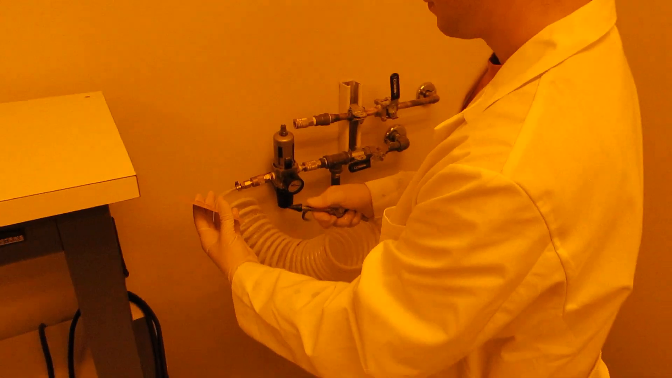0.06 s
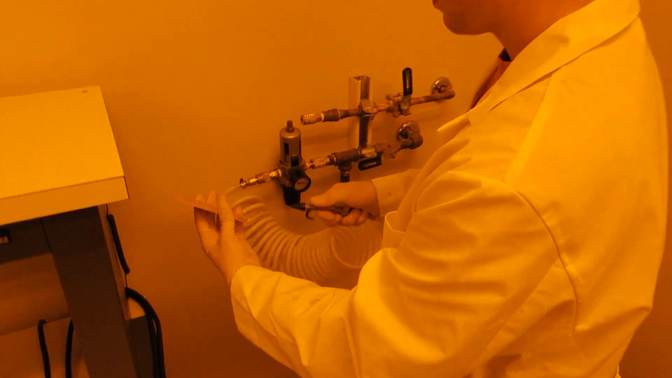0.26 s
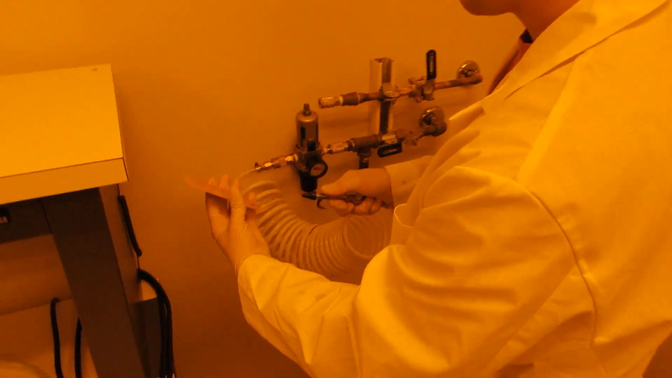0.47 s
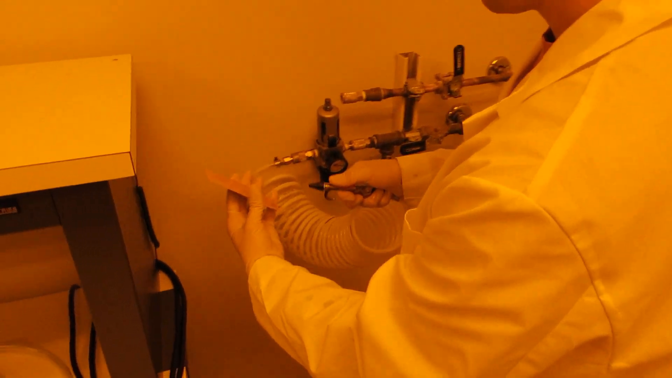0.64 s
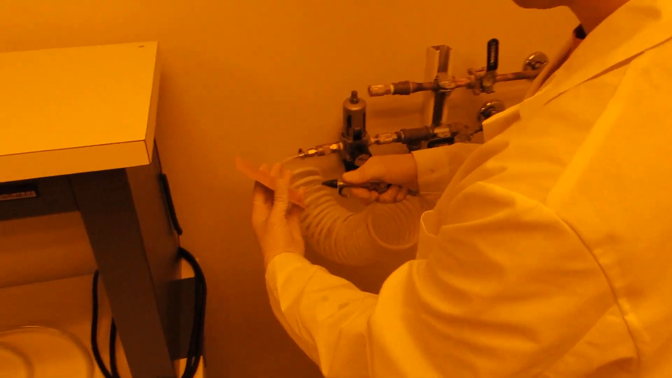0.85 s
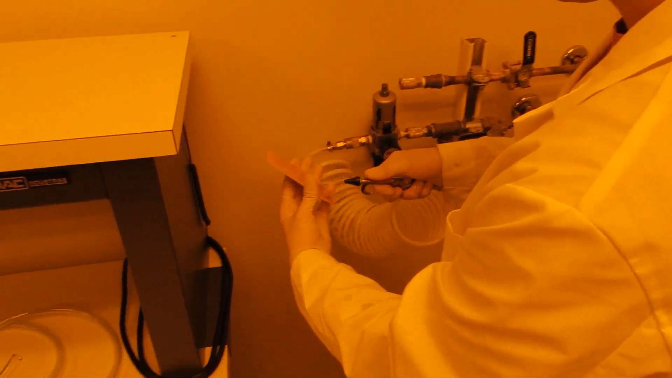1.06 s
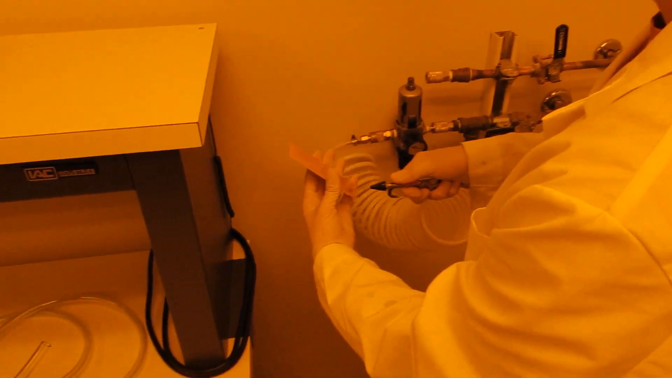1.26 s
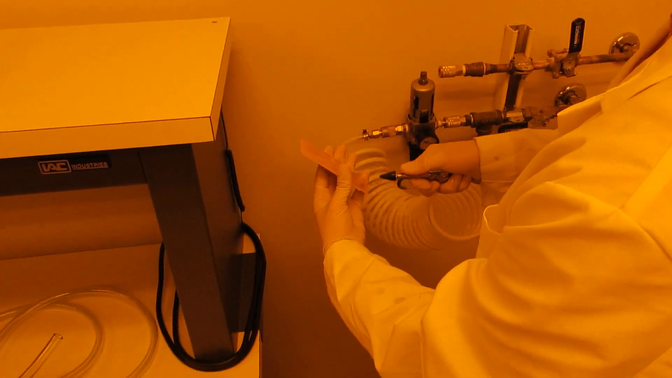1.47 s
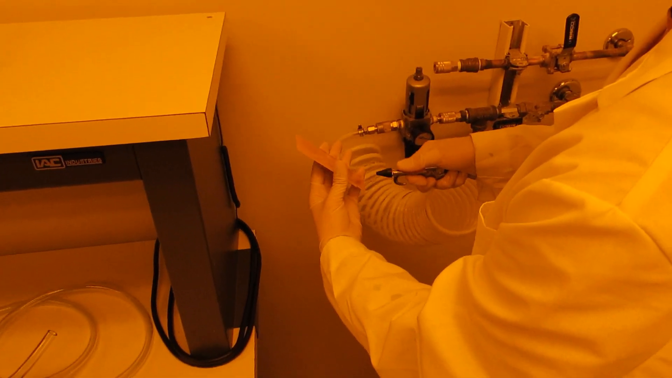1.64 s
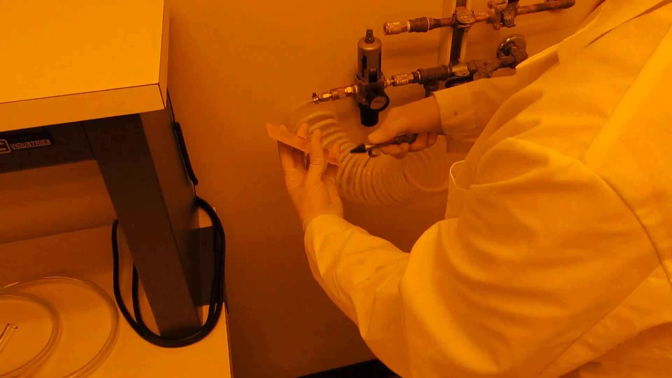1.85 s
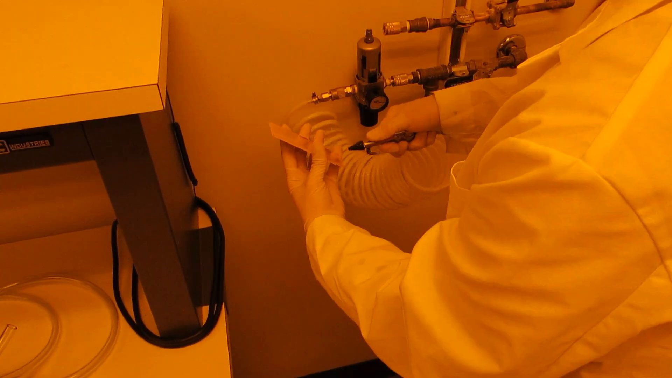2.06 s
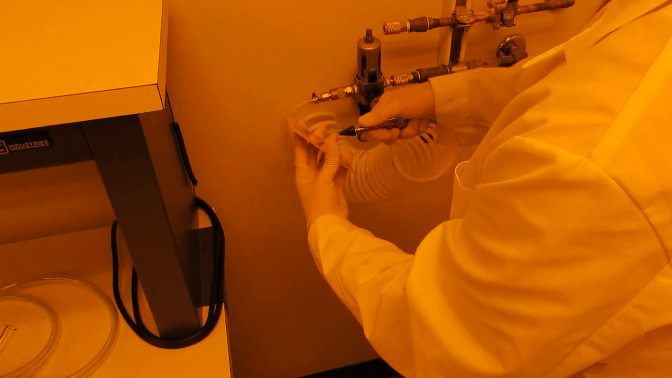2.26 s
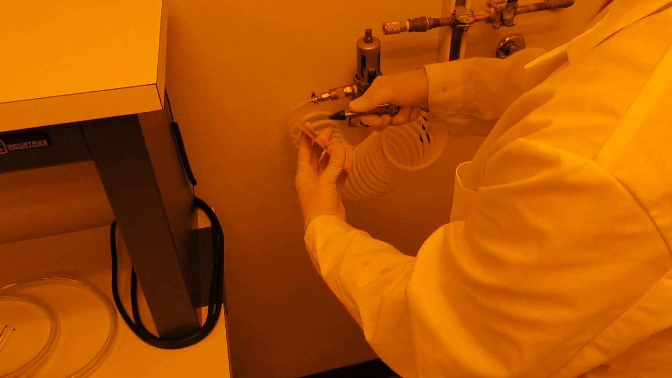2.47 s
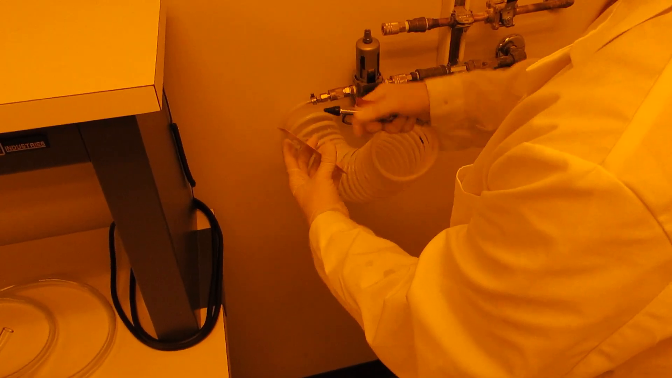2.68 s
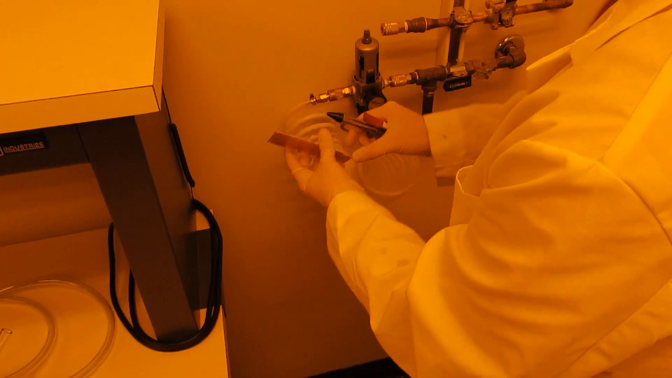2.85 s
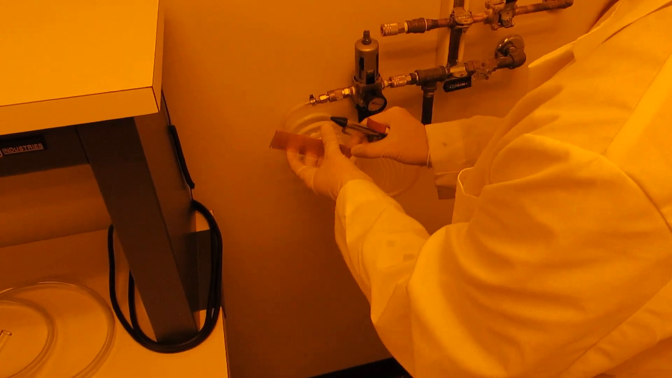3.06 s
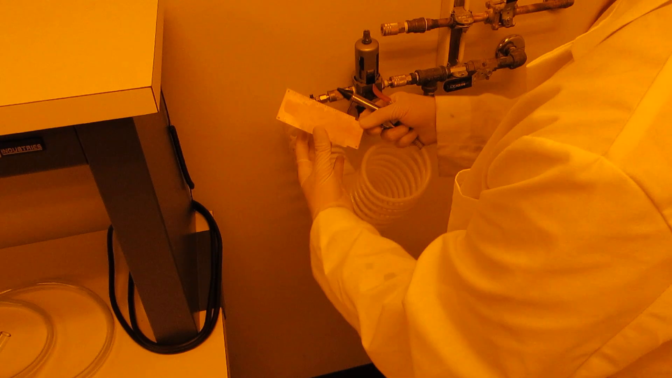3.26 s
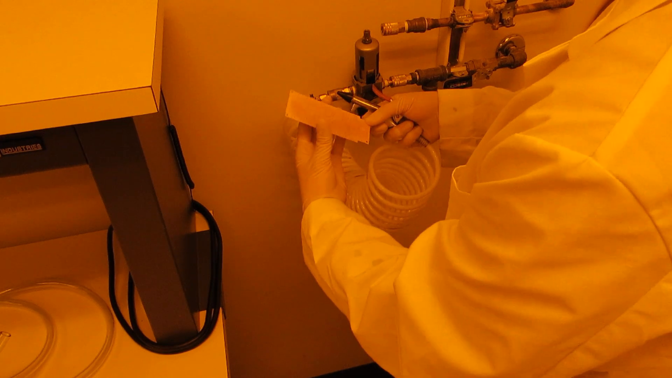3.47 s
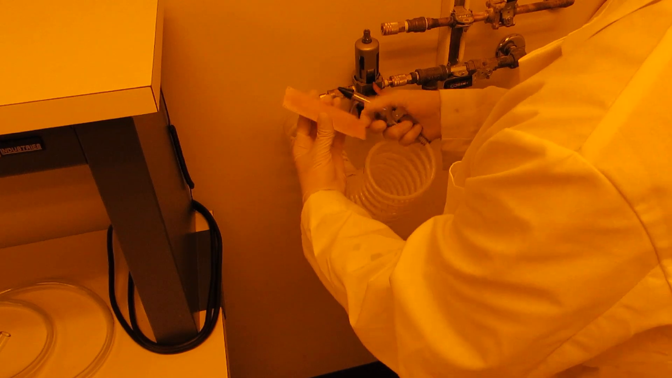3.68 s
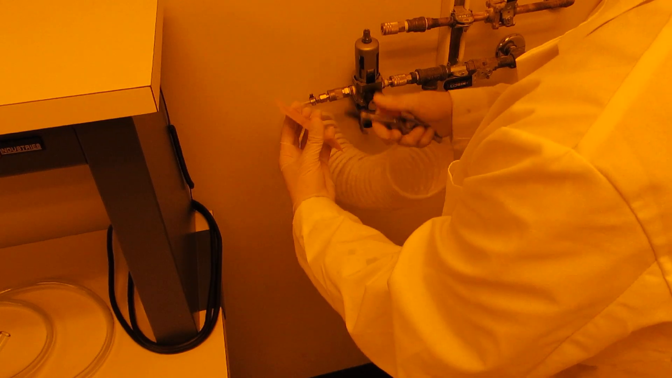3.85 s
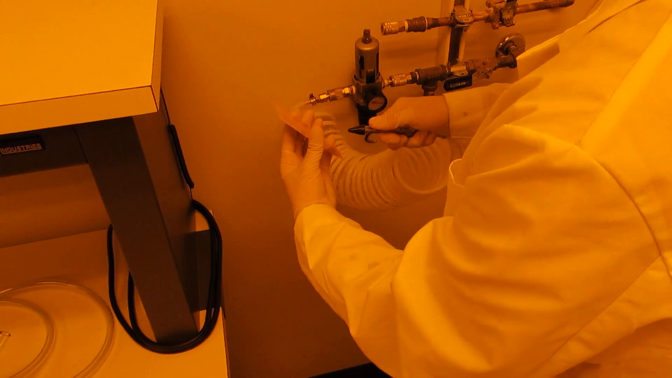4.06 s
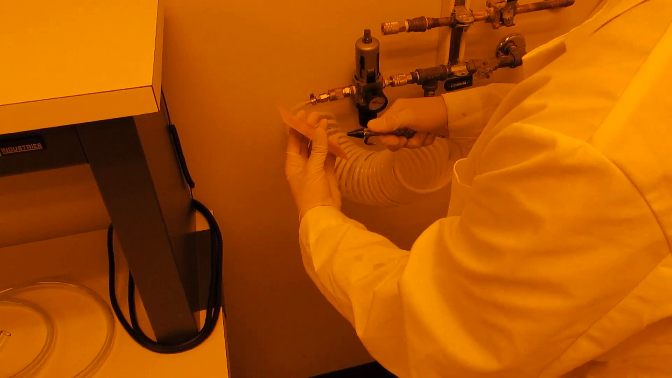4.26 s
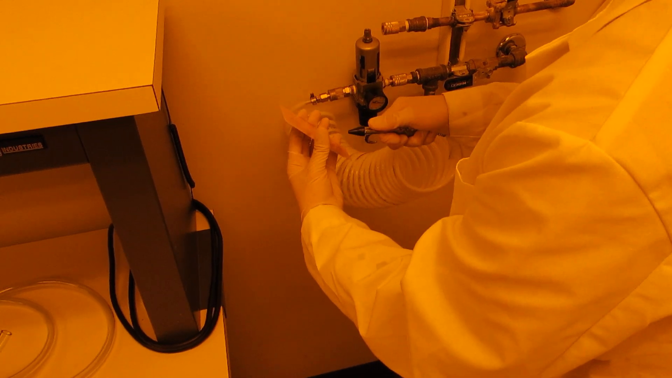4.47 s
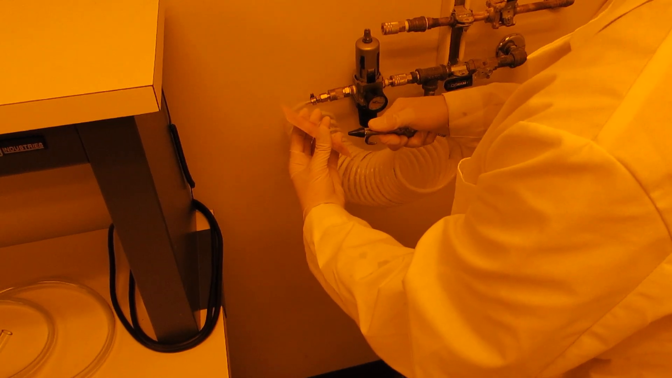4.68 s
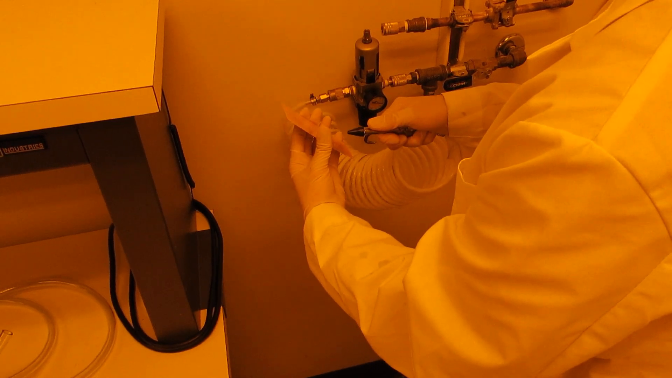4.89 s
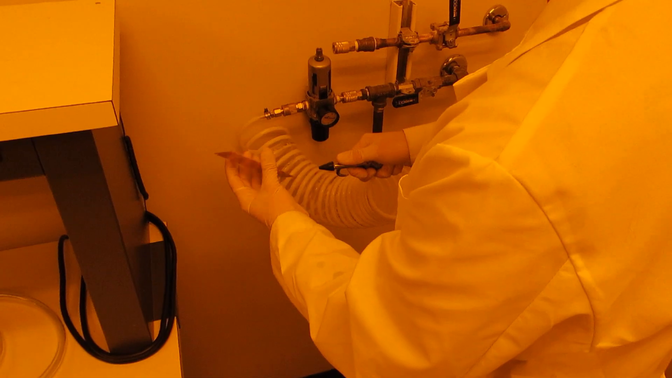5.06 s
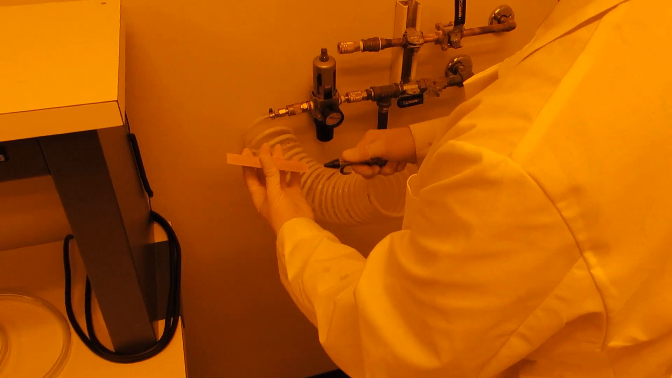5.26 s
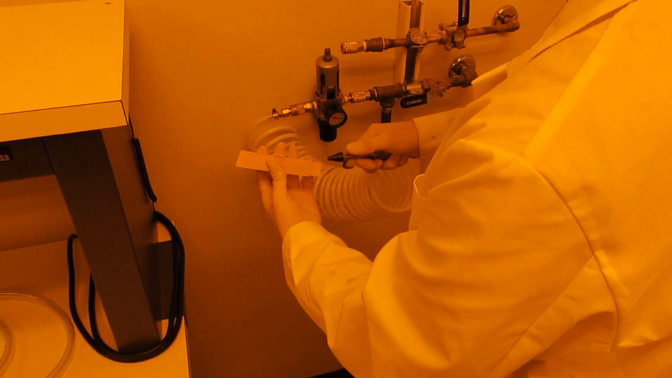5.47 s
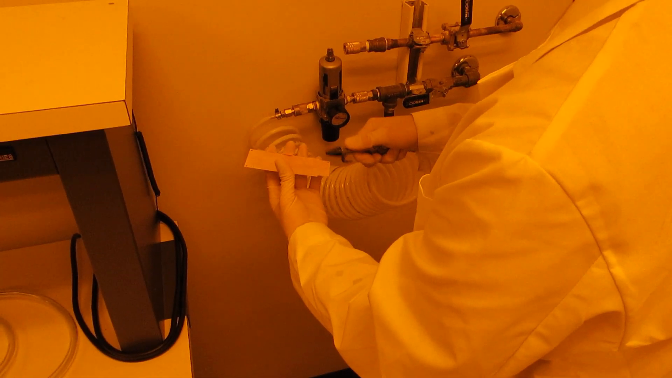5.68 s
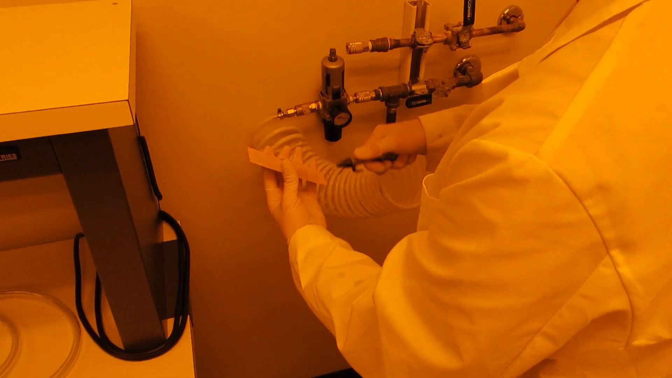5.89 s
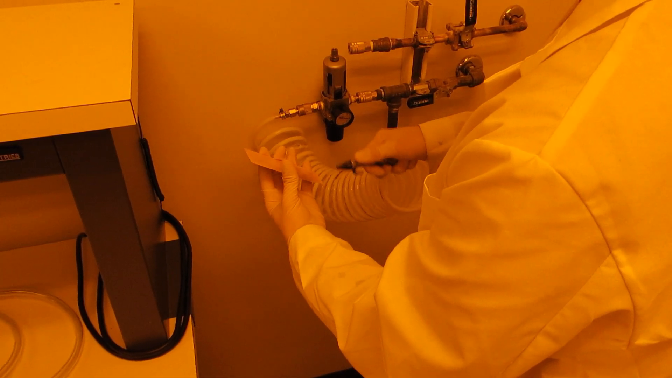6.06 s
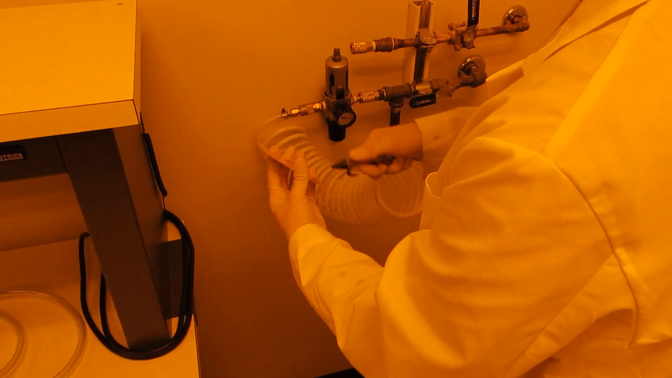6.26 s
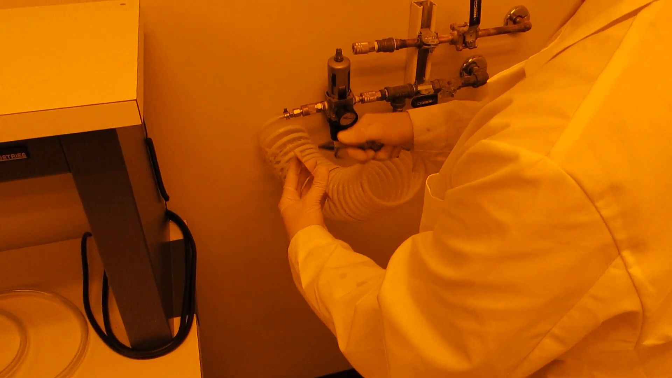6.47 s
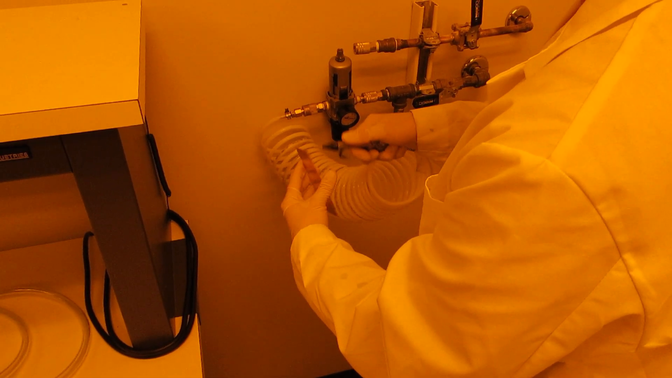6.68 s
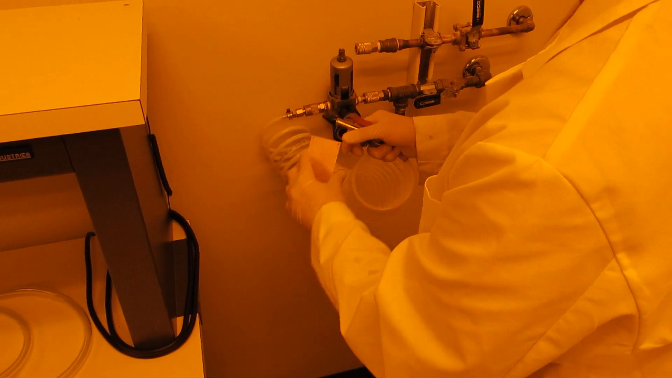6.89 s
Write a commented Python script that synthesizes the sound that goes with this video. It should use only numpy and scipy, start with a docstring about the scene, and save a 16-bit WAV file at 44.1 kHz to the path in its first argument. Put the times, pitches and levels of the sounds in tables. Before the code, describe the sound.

Two long, fluttering blasts of hissing gas from a blow gun dry a circuit board, with low ventilation hum in the pause.

```python
"""In a hard-walled room, a gas blow gun sweeps over a hand-held circuit board in two long bursts.
The turbulent jet hisses and sings at the nozzle, splashes on the board, tears at its edges and
buffets the hand; the trigger rattles just before the second burst. Nearby surfaces reflect the
sound, and the room reverberates after each release, over ventilation and mains hum."""
import sys
import numpy as np
from scipy import signal
from scipy.io import wavfile
from scipy.ndimage import uniform_filter1d

SR = 44100
rng = np.random.default_rng(int(sys.argv[2]) if len(sys.argv) > 2 else 0)


def waveform_to_disk(signal):
    """Save audio, clipped to [-1, 1], as 16-bit WAV at the path in sys.argv[1]."""
    frames = np.transpose(np.atleast_2d(signal))
    scaled = np.clip(frames, -1, 1) * 32767
    samples = np.round(scaled).astype(np.int16)
    wavfile.write(sys.argv[1], SR, samples)


N = 305613


def amp(db):
    """Amplitude ratio of a level: a factor of ten per 20 dB."""
    return 10 ** (np.asarray(db) / 20)


def unit_rms(x):
    """Normalisation to unit mean power."""
    return x / np.sqrt(np.mean(x ** 2) + 1e-20)


def at_frequency(points, hz):
    """Interpolation of (f/Hz, value) points on a logarithmic frequency axis."""
    f, value = np.transpose(points)
    return np.interp(np.log(hz + 1), np.log(f + 1), value)


def arch(t, start, length, skew, blunt):
    """A warped half-sine and the progress through it: skew < 1 peaks early, lower blunt is flatter."""
    progress = np.clip((t - start) / length, 0, 1)
    return abs(np.sin(np.pi * progress ** skew)) ** blunt, progress


def turbulence(spectrum, spread, size, patchy_db, flicker_db, octaves=np.zeros(N)):
    """Random-phase noise, mid and side: a spectrum that can slide, with drifting patches and flicker."""
    hop = size // 4
    frames, hz = N // hop + 5, np.fft.rfftfreq(size, 1 / SR)
    mid_re, mid_im, side_re, side_im, patches = rng.standard_normal((frames, len(hz), 5), np.float32).T
    patches = uniform_filter1d(patches, size=3, axis=0)  # smooth over frequency, then time
    patches = unit_rms(uniform_filter1d(patches, size=16, axis=1))
    flicker = unit_rms(uniform_filter1d(rng.standard_normal(frames), size=5))
    slide = 2 ** octaves[np.minimum(np.arange(frames) * hop, N - 1)]
    shape = amp(at_frequency(spectrum, hz[:, None] / slide))
    shape /= np.sqrt((shape ** 2).mean(0))  # sliding keeps the power
    side_gain = amp(at_frequency(spread, hz))[:, None]
    bins = np.array([mid_re + 1j * mid_im, (side_re + 1j * side_im) * side_gain])
    bins *= shape * amp(patchy_db * patches + flicker_db * flicker)
    pair = signal.istft(bins, nperseg=size, noverlap=size - hop)[1][:, :N]
    return pair / np.sqrt(np.mean(pair[0] ** 2))


def narrow_band(hz, width_hz, count):
    """Modulation: slow complex noise on a carrier tone gives a narrow, wavering band."""
    pole = np.exp(-np.pi * width_hz / SR)
    white = rng.standard_normal((2, count + 8000))
    slow = signal.lfilter([1], [1, -2 * pole, pole * pole], white)[:, 8000:]  # once settled
    carrier = np.exp(2j * np.pi * hz * np.arange(count) / SR)
    return unit_rms(((slow[0] + 1j * slow[1]) * carrier).real)


def jet():
    """Flow noise: turbulence radiates at nozzle, board, edge and hand; smaller eddies sound higher."""
    # the jet between sweeps, one list a burst: t/s, hiss, splash, tear, buffet level/dB, eddy pitch/octaves
    bursts = [
        [(0.0, -19, -29.5, -31, -30, -0.34), (0.3, -20, -38, -30, -32.5, -0.21),
         (0.55, -17, -28.5, -25, -28, -0.044), (0.88, -17, -27.5, -29, -33.5, -0.13),
         (1.05, -14, -20.5, -25.5, -32.5, -0.097), (1.86, -13.5, -21, -28, -35, 0),
         (1.92, -13.5, -26, -29.5, -38.5, 0), (2.0, -14, -24, -29, -37, .1),
         (2.4, -16, -22, -31, -40.5, -0.031), (2.56, -16.5, -17, -28, -51, 0.25),
         (2.67, -20, -23, -22.5, -41, .1)],
        [(3.9, -21.5, -31.5, -33, -32, -.3), (3.94, -17, -27, -27.5, -35, -.25),
         (4.1, -17, -26, -27.5, -35, -.2), (4.4, -17, -25, -28.5, -35.5, -0.097),
         (4.945, -14.5, -25, -30, -35, -0.17), (4.965, -17.5, -20.5, -11.5, -34.5, 0.043),
         (5.15, -16.5, -23.5, -22.5, -35, -0.14), (5.35, -20, -29.5, -32.5, -37, -0.044),
         (5.58, -19.5, -29.5, -32, -36.5, -0.21), (5.95, -20, -26, -27.5, -34.5, -0.078),
         (6.45, -19, -23.5, -28, -42.5, -0.066), (6.56, -15.5, -21.5, -31, -54, 0.24),
         (6.68, -17, -30, -36, -50, 0.16), (6.78, -19, -26.5, -39, -46, 0.18)],
    ]
    # the jet crosses the board: start/s, length/s, splash, tear, buffet rise/dB, eddy shift/octaves
    sweeps = [(0.0, 0.099, 5.5, 5.5, 1.5, -.1), (0.111, 0.071, 4.5, 1, 6, -.1), (0.214, .07, 10, 3, -1, .1),
              (0.308, 0.087, -4, 6, 6, .1), (0.378, .14, 9.5, 5.5, -0.5, 0.16),
              (0.679, 0.11, 0, 11, 8.5, 0.0076), (0.789, 0.1, 4.5, 9.5, -1.5, 0.066),
              (0.883, .13, 10, 9, 2, -0.0061), (1.15, .1, 3, 3.5, 3.5, -0.023),
              (1.426, 0.097, 4, 5, 0, 0.11), (2.257, .1, 4.5, 7, 7.5, .1), (4.99, 0.16, 6, -0.5, 2, 0.15),
              (5.163, 0.17, 5, 7.5, 6, -.1), (5.378, .13, 9, 13.5, 3, 0.029),
              (5.609, 0.13, 10, 10.5, 4, 0.12), (5.79, .16, 7.5, 4.5, -2.5, .05),
              (6.009, 0.1, 10, 8.5, 0.5, 0.029), (6.2, .1, 5, 9.5, 0, .05),
              (6.302, 0.066, -3, 4.5, 1, 0.11), (6.378, 0.1, 5.5, 7.5, 7, -0.071)]
    # the jet slips off the board and the bare hiss flares: start/s, length/s, rise/dB
    flares = [(1.293, .14, 1.5), (1.786, 0.11, 2.5), (1.963, .09, 2.5), (2.18, 0.064, 3), (2.266, 0.079, 4),
              (2.55, 0.082, 4), (5.28, 0.1, 12), (6.087, 0.11, 9), (6.3, .06, 2.5), (6.48, .08, 2.5),
              (6.68, 0.067, 4.5)]
    # spectra at nozzle, board, edge and hand: f/Hz, relative density/dB
    hiss = [(2500, -26.5), (5000, -7), (7500, -2), (9500, 0.5), (12000, 1), (14500, -0.5), (15800, -4.5)]
    splash = [(1000, -27.5), (2200, -8), (3200, 1.5), (4600, 0.5), (6200, 0.5), (8500, -4.5),
              (14000, -31.5)]
    tear = [(300, -32.5), (800, -13), (1300, -2.5), (2000, 1), (2700, -2), (4000, -5.5), (8000, -12.5)]
    buffet = [(20, -30), (40, -20), (76, -7.5), (97, -13.5), (135, -5.5), (220, -9), (420, 2.5), (520, -3),
              (680, 2.5), (1100, 0.5), (2200, -21)]
    # left and right differ most at short wavelengths: f/Hz, side minus mid/dB
    spread = [(60, -65), (140, -42), (330, -50.5), (770, -15.5), (1300, -17.5), (1900, -70), (3500, -95),
              (5200, -26.5), (6400, -9.5), (9800, -7.5), (15000, -4.5)]
    t = np.arange(N) / SR
    gains, lift_db = np.zeros((2, 4, N))
    for burst in bursts:
        times, *levels, _ = np.transpose(burst)
        # the first burst is already blowing at t = 0
        opening = np.clip((t - times[0]) / 0.0082, 0, 1) ** 2 if times[0] > 1 else 1
        closing = np.clip((times[-1] - t) / 0.022, 0, 1)
        gains += opening * closing * amp([np.interp(t, times, db) for db in levels])
    both = np.concatenate(bursts)
    eddy_octaves = np.interp(t, both[:, 0], both[:, -1])
    for start, length, splash_db, tear_db, buffet_db, shift in sweeps:
        hump, progress = arch(t, start, length, skew=0.62, blunt=1.44)
        lift_db += np.outer([0.13 * splash_db, splash_db, tear_db, buffet_db], hump)
        eddy_octaves += (shift + 0.15 * (2 * progress - 1)) * hump  # pitch climbs through a sweep
    for start, length, db in flares:
        hump, _ = arch(t, start, length, skew=0.76, blunt=1.7)
        lift_db[:2] += np.outer([db, 0.43 * db], hump)  # the splash shares in the flare
    eddy_octaves = np.clip(eddy_octaves, -1, 1)
    parts = [turbulence(hiss, spread, size=512, patchy_db=1.0, flicker_db=0.72),
             turbulence(splash, spread, size=512, patchy_db=2.5, flicker_db=0.9, octaves=eddy_octaves),
             turbulence(tear, spread, size=512, patchy_db=2.0, flicker_db=0.64, octaves=eddy_octaves),
             turbulence(buffet, spread, size=2048, patchy_db=1.5, flicker_db=1.4)]
    return sum(gain * part for gain, part in zip(gains * amp(lift_db), parts))


def early_reflections(direct):
    """Superposition of direct sound and echoes from wall, bench and pipes; paths vary as hands move."""
    # one echo a row: relative level/dB, then delay/s at each of the moments
    echoes = [(-33.5, .0005, 0.0008, 0.00068, 0.00066), (-24.5, .00135, 0.0009, 0.0006, 0.00098),
              (-24.5, 0.0035, .0028, 0.0036, 0.0032), (-24, .00365, .0038, .0038, 0.004),
              (-21, .0045, 0.0045, 0.005, 0.0079), (-27, 0.0049, 0.0043, .00565, 0.012)]
    # moments between which the delays glide: t/s
    moments = [1.4, 2.3, 4.9, 5.2]
    n, out = np.arange(N), direct.copy()
    for db, *delays in echoes:
        lag = np.round(np.interp(n / SR, moments, delays) * SR).astype(int)
        out += amp(db) * direct[:, abs(n - lag)]
    return out


def reverberation(direct):
    """A diffuse field: convolution with a noise tail whose bands each decay at their own rate."""
    # reverberation time of the room: f/Hz, T60/s
    decay_times = [(250, 0.32), (1000, 0.39), (3000, 0.54), (4800, 0.57), (7000, 0.53), (12000, 0.33),
                   (16000, 0.29)]
    length = SR // 2
    hz, t, bins = signal.stft(rng.standard_normal(length), SR, nperseg=256)
    bins *= amp(-60 * t / at_frequency(decay_times, hz)[:, None])
    band_energy = uniform_filter1d((abs(bins) ** 2).sum(1), size=9)
    bins /= np.sqrt(band_energy)[:, None]
    tail = signal.istft(bins, SR, nperseg=256)[1]
    tail = np.r_[np.zeros(350), tail / np.linalg.norm(tail)]  # arrives 8 ms late
    lead_in = direct[:, length:0:-1]  # the jet already fills the room at t = 0
    return signal.fftconvolve(np.c_[lead_in, direct], tail[None], axes=1)[:, length:length + N]


def ventilation():
    """Broadband flow noise, a narrow-band duct boom and the line spectrum of fan shaft and mains."""
    # moving air: f/Hz, relative density/dB
    air = [(20, -20), (40, -16), (60, -8.5), (78, -7.5), (100, -17), (140, 0), (200, -10.5), (270, -4),
           (420, -14), (620, -10), (1300, -14), (2200, -25), (4000, -35.5), (6500, -42), (12900, -40.5),
           (13600, -33.5), (14300, -49), (15700, -72.5)]
    # its stereo width: f/Hz, side minus mid/dB
    air_spread = [(20, -48), (110, -40), (200, -24), (380, -16), (1300, -12), (4400, -13), (8000, -6),
                  (15000, -6)]
    # the boom swells and fades: t/s, level/dB
    duct = [(0.0, -47.5), (1.9, -48), (2.7, -50.5), (3.3, -46.5), (3.8, -48), (3.9, -38.5), (4.1, -49.5),
            (5.6, -48.5), (6.5, -44.5), (6.93, -45)]
    # fan shaft and mains tones: f/Hz, level/dB
    hum = [(54.8, -53), (119.9, -50.5), (240.5, -54.5), (360, -57.5)]
    t = np.arange(N) / SR
    out = amp(-46.5) * turbulence(air, air_spread, size=2048, patchy_db=0.4, flicker_db=0.3)
    out[0] += amp(np.interp(t, *np.transpose(duct))) * narrow_band(hz=172, width_hz=24, count=N)
    out[0] += sum(amp(db) * np.sqrt(2) * np.sin(2 * np.pi * (hz * t + rng.random())) for hz, db in hum)
    return out


def singing():
    """Narrow-band noise is heard as pitch: faint whistles of the jet swell and fade in the hiss."""
    # whistles: start/s, end/s, f/Hz, width/Hz, level/dB
    whistles = [(.9, 1.56, 3090, 90, -33.5), (2.36, 2.64, 4550, 600, -28), (3.95, 4.93, 3080, 160, -41),
                (3.95, 4.93, 4400, 150, -36.5), (3.95, 4.93, 5800, 170, -35.5),
                (3.95, 4.93, 8150, 300, -35), (5.42, 5.48, 2300, 120, -34), (5.82, 5.9, 2300, 90, -32)]
    out = np.zeros((2, N))
    for start, end, hz, width_hz, db in whistles:
        first, last = round(start * SR), round(end * SR)
        swell = signal.windows.tukey(last - first, 0.3)
        out[0, first:last] += amp(db) * narrow_band(hz, width_hz, count=last - first) * swell
    return out


def trigger():
    """Impact excitation: brief scrapes of noise ring the heavily damped modes of the trigger lever."""
    # the trigger rattles under the finger: t/s, peak level/dB
    ticks = [(3.703, -43), (3.7104, -48), (3.8477, -34.5), (3.8534, -36.5), (3.8604, -40), (3.8664, -44)]
    # modes of the lever: f/Hz, relative level/dB, T60/s
    modes = [(3900, -3, .004), (5330, 8.5, .005), (6250, -7, .004), (8300, -12, .003), (11300, -5, .004)]
    out, t = np.zeros((2, N)), np.arange(400) / SR
    scrapes = rng.standard_normal((len(ticks), len(t))) * amp(-60 * t / 0.006)
    ring = sum(amp(db - 60 * t / t60) * np.sin(2 * np.pi * hz * t) for hz, db, t60 in modes)
    for (start, db), scrape in zip(ticks, scrapes):
        tick, first = np.convolve(scrape, ring), round(start * SR)
        out[0, first:first + len(tick)] += amp(db) * tick / abs(tick).max()
    out[1] = 0.18 * out[0]  # a little to the left
    return out


def scene():
    """Superposition of gun, room and ventilation; mid plus and minus side gives left and right."""
    gun = jet() + singing() + trigger()
    mid, side = amp(-0.78) * early_reflections(gun) + amp(-6.5) * reverberation(gun) + ventilation()
    return np.array([mid + side, mid - side])


def record(dry):
    """A time-varying gain, then band limiting by a linear-phase low-pass filter."""
    # the whole level sinks in steps under each burst and creeps back afterwards: t/s, gain/dB
    gain_curve = [(0, 1), (.9, -2), (1.0, -4), (1.85, -4), (1.92, -6), (2.748, -4.5), (3.3, 0), (3.9, 0.5),
                  (4.945, -2.5), (4.965, -6.5), (6.93, -3)]
    gain = amp(np.interp(np.arange(N) / SR, *np.transpose(gain_curve)))
    low_pass = signal.firwin(4095, cutoff=15665, window=("kaiser", 7), fs=SR)
    return signal.oaconvolve(dry * gain, low_pass[None], "same")


dry = scene()
out = record(dry)
waveform_to_disk(out)
```